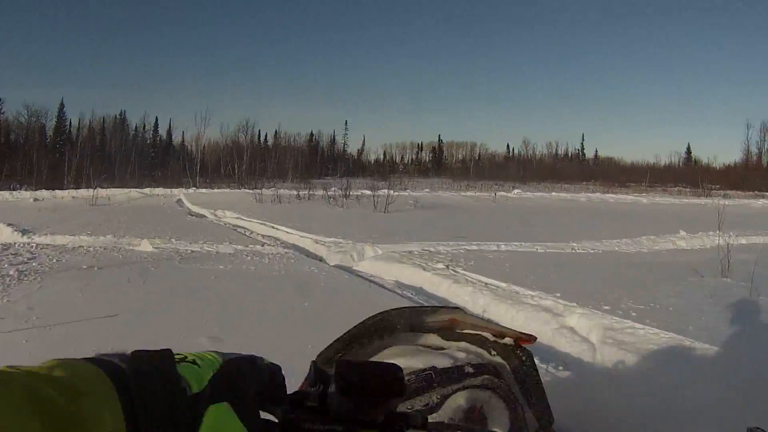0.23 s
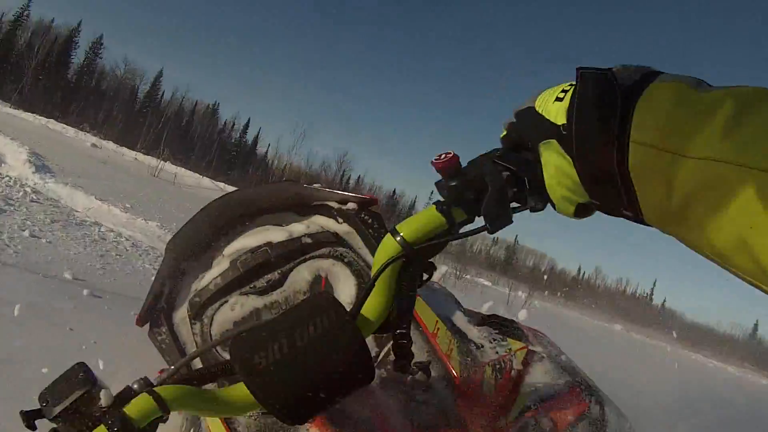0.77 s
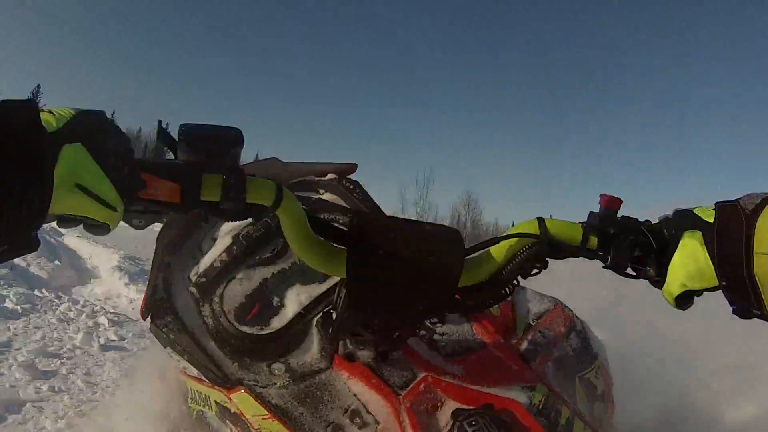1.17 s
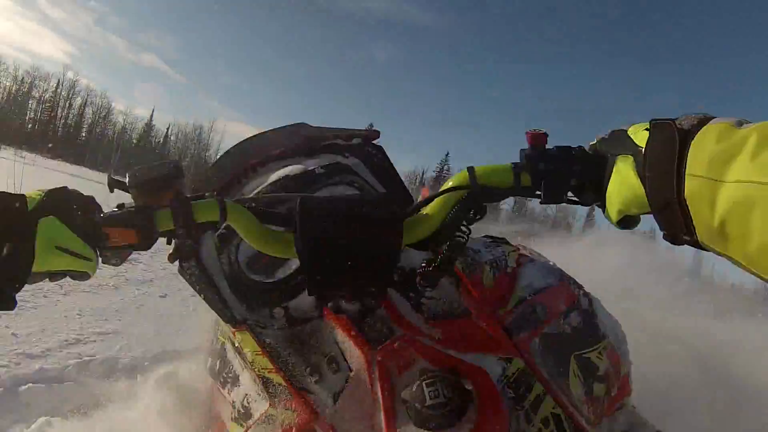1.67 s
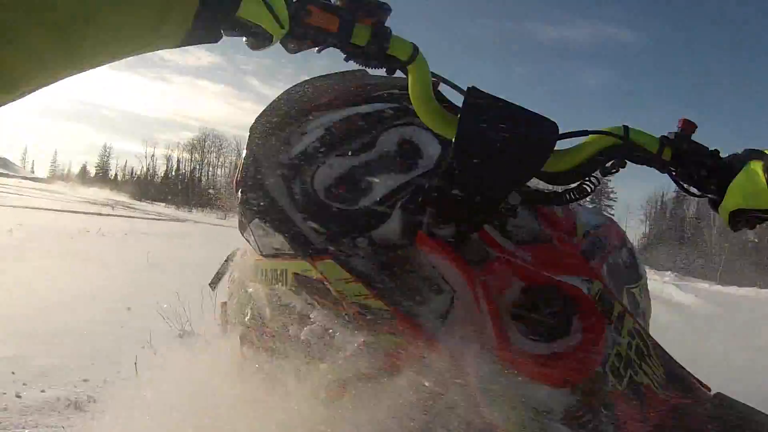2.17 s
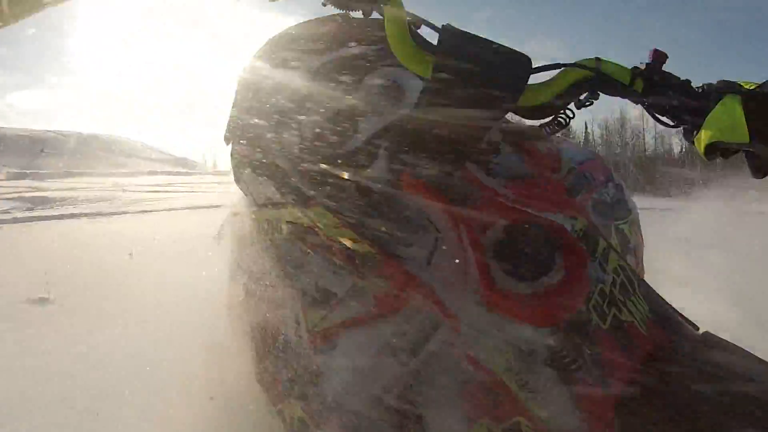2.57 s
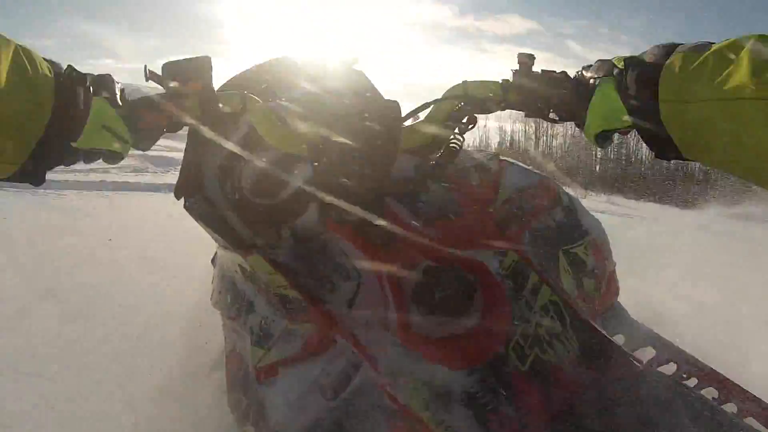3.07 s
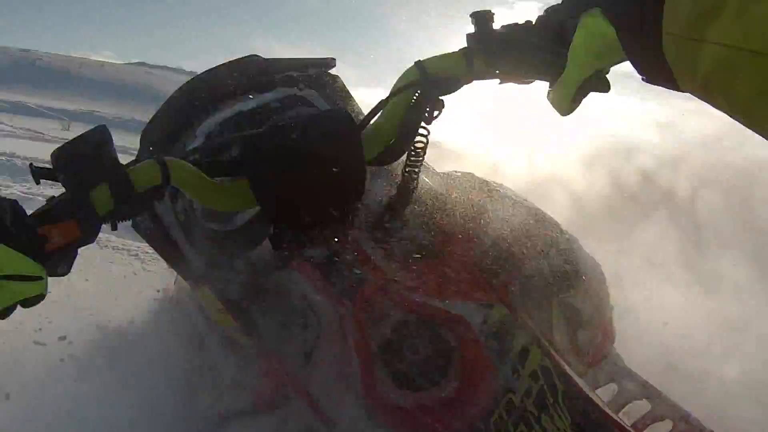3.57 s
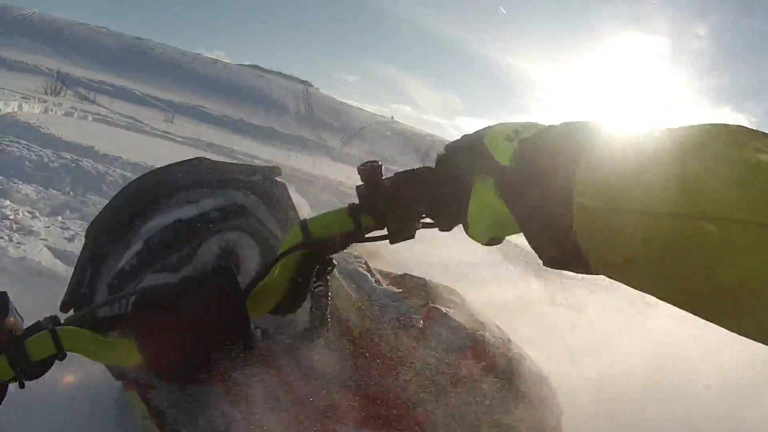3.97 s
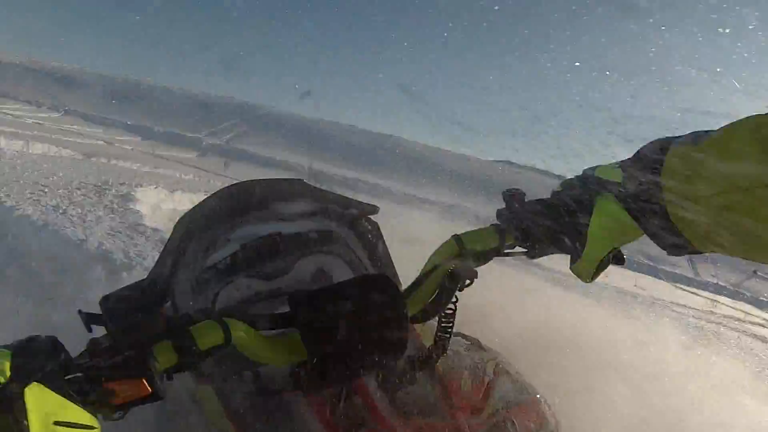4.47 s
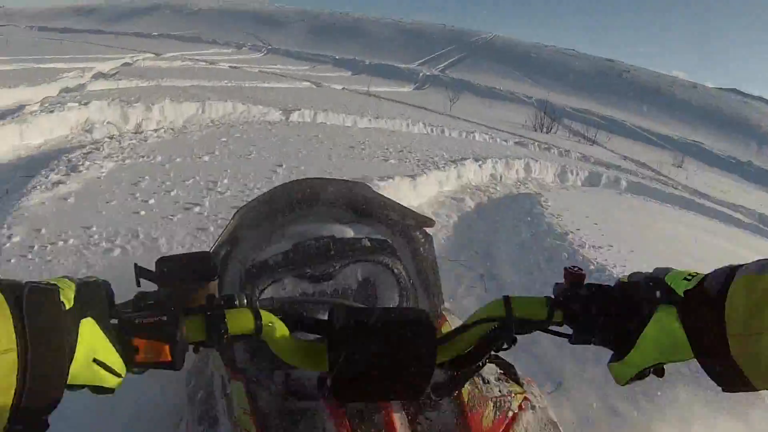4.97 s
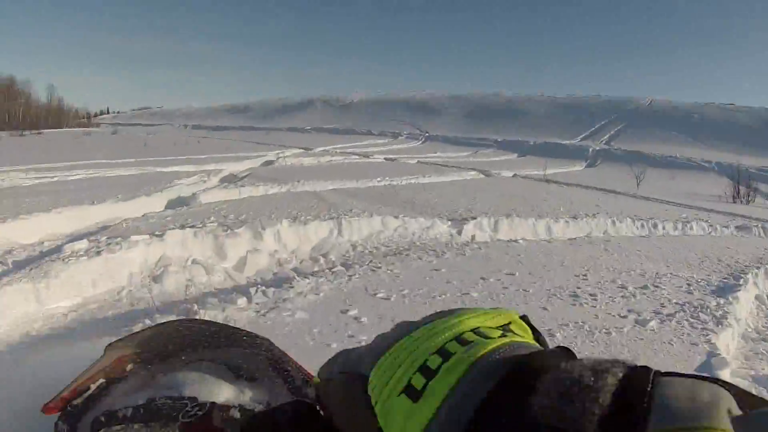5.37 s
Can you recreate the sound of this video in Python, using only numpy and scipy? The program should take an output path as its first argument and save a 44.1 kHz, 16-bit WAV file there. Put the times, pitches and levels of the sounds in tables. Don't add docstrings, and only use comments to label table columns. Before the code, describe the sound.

Close outdoor snowmobile engine: buzzing, nasal two-stroke pulls over a rough roar, two brief let-offs, sharp ice ticks, then revs rising again.

```python
import sys
import numpy as np
from scipy import signal
from scipy.fft import rfft, irfft, next_fast_len
from scipy.io import wavfile
from scipy.ndimage import uniform_filter1d, map_coordinates

SR = 44100
rng = np.random.default_rng(int(sys.argv[2]) if len(sys.argv) > 2 else 0)


def waveform_to_disk(signal):
    frames = np.transpose(np.atleast_2d(signal))
    scaled = np.clip(frames, -1, 1) * 32767
    samples = np.round(scaled).astype(np.int16)
    wavfile.write(sys.argv[1], SR, samples)


def undo_db(level):
    steps = np.asarray(level, float) / 20
    return 10 ** steps


N = 248283

# t/s,
# firing rate f/Hz, effort as roar level/dB
REVS = [
    (0, 190, -36),
    (.2, 209.7, -32.5),
    (.4, 240.5, -27),
    (.5, 257.3, -26),
    (.6, 264.2, -25),
    (.69, 261, -23),
    (.8, 221.5, -29.5),
    (.87, 204.2, -28),
        (.95, 211.1, -26.5),
    (1.101, 231.5, -27),
    (1.351, 234.4, -27.5),
    (1.62, 244.4, -26.5),
    (1.8, 239.8, -25.5),
    (2, 253.1, -24),
    (2.2, 256.8, -26),
    (2.3, 243.2, -26),
    (2.4, 240.2, -24.5),
        (2.6, 244.1, -24),
    (2.8, 241.3, -24.5),
    (3.1, 242.6, -25),
    (3.3, 244.1, -25),
    (3.41, 241.5, -26),
    (3.5, 234.3, -26),
    (3.615, 226.2, -27.5),
    (3.69, 190.4, -32.5),
    (3.8, 160.4, -37.5),
        (3.9, 151, -36.5),
    (4, 167.2, -31.5),
    (4.2, 219.8, -26),
    (4.3, 244.3, -25),
    (4.47, 250.3, -29.5),
    (4.55, 222.8, -32.5),
    (4.7, 160.4, -35.5),
    (4.8, 148.7, -38),
        (4.9, 167.6, -32.5),
    (5, 190.9, -32),
    (5.045, 189, -37),
    (5.07, 187.7, -38.5),
    (5.2, 169.4, -43.5),
    (5.32, 158.7, -42),
    (5.4, 179.6, -33.5),
    (5.5, 208.5, -31),
    (5.63, 243.7, -27),
]
# start t/s, end t/s, firing lines over the roar level/dB
PIPE_SONG = [(0.479, 0.678, 9), (0.832, .93, 4.5), (0.968, 1.142, 10), (1.149, 1.62, 6.5),
             (1.618, 2.237, 10), (2.242, 2.65, 4.5), (2.65, 3.05, 5.5), (3.05, 3.608, 8),
             (4.206, 4.308, 11), (4.309, 4.37, 8), (4.37, 4.48, 5), (5.541, 5.7, 1.5)]
# start t/s, end t/s, firing lines over the roar level/dB
SHUT = [
    (3.6, 3.839, -9.5),
    (4.499, 4.622, -7),
    (5.051, 5.327, -7),
]
# f/Hz, level/dB
LINES_AT = [(300, -2), (900, -8.5), (1200, -10), (1420, -15.5), (1700, 0.5), (2000, -10.5), (2350, -12.5),
            (2750, -2), (3000, -11.5), (3300, -29), (5000, -26.5), (6500, -30)]
# t/s, shaft order, change level/dB, half length t/s
SWELLS = [(0.094, 4, -11, .14), (0.035, 3, 12, 0.069), (0.1, 7, 14, 0.17), (0.29, 14, 16, 0.061),
          (0.74, 18, -9, 0.26), (0.64, 20, 8.5, 0.13), (0.847, 26, 8.5, .06), (1.1, 12, -4, 0.098),
          (1.3, 14, -12, 0.13), (1.37, 15, 13.5, .38), (1.293, 4, 4, 0.35), (1.78, 18, 4.5, 0.28),
          (2.03, 12, 4.5, 0.26), (2.08, 38, 11, .06), (3.735, 4, 10, .04), (2.81, 14, 0.5, 0.16),
          (3.3, 8, 2, 1.7), (2.8, 16, 5.5, 0.2), (2.043, 4, -5.5, 0.18), (2.8, 6, -5.5, 0.75),
          (2.954, 22, 7.5, 0.15), (3.4, 16, -9, .26), (3.36, 24, 5.5, 0.34), (4.23, 10, -7, 0.18),
          (3.933, 4, 11.5, 0.072), (4.223, 4, 7.5, 0.057), (4.405, 9, 10.5, 0.11), (4.4, 4, -12, 0.063),
          (4.7, 4, 7, .08), (5.565, 15, 20.5, 0.071)]
# t/s, change level/dB, half length t/s
SEAT = [
    (.03, 4.5, 0.082),
    (.22, -14, 0.071),
    (.78, 7.5, .07),
    (.92, -8, 0.076),
    (2.95, -3.5, 0.43),
    (3.74, -7, .08),
    (4.05, -7, 0.17),
    (4.5, 6.5, .07),
    (5.01, 9.5, .04),
]
# f/Hz, level/dB per Hz
ROAR = [(120, -36), (400, -34), (800, -28.5), (1000, -13), (1150, -19), (1380, -16.5), (1560, -1.5),
        (1720, 0.5), (1950, -7), (2400, -11), (2780, -5.5), (3050, -15.5), (3600, -25.5), (7000, -85)]
# t/s, level/dB, length t/s
BURNS = [
    (3.726, -31, 0.026),
    (3.794, -54, 0.018),
]
# f/Hz, level/dB per Hz
BODY = [(60, -27), (160, -19), (400, -3.5), (850, -8.5), (1050, -10.5), (1150, 5), (1280, -11.5),
        (1500, -36), (3000, -74.5)]
# f/Hz, level/dB per Hz
PANEL = [(700, -50), (1060, -12), (1150, 0), (1240, -12), (1800, -55)]
# f/Hz, level/dB per Hz
INTAKE = [(4000, -30), (6800, -13), (7400, 0.5), (8500, -7), (10000, -23), (15000, -58)]
# f/Hz, level/dB per Hz
HISS = [(2500, -24), (3300, -2.5), (3800, -2.5), (4400, -1), (5000, -0.5), (5400, 2), (5900, -4),
        (6700, -12), (7300, -5.5), (8500, -9.5), (9600, -13), (10500, -18.5), (12500, -28), (15500, -36)]
# t/s, lug rate f/Hz, lug tone level/dB
TRACK = [(0, 146, -44.5), (.4, 181, -38), (.66, 242, -44), (.88, 205, -50), (1.35, 209, -32),
         (1.7, 223, -32), (2.15, 255, -52), (2.38, 231, -33), (2.6, 235.5, -33), (3.1, 234, -33),
         (3.3, 240, -42), (3.62, 213, -33), (4, 129, -48), (4.45, 203, -39), (4.68, 175, -41),
         (5, 240, -58), (5.3, 195, -49), (5.63, 220, -52)]
# t/s, sprocket change level/dB, half length t/s
UNLOADED = [
    (.88, -25, 0.06),
    (1.76, -20, 0.038),
    (3.68, 8, .06),
    (4.76, 10, 0.097),
    (5.63, -26, 0.11),
]
# t/s, level/dB, pitch f/Hz
THUDS = [
    (1.724, -14, 259.7),
    (2.175, -25, 90.2),
    (2.879, -26, 69.9),
    (3.02, -26, 70.1),
]
# f/Hz, level/dB per Hz
WIND = [(15, -11), (30, 4), (100, -1), (250, 0.5), (600, -14), (3000, -96)]
# start t/s, end t/s, level/dB
SPRAY = [(.5, 0.614, -56), (1.733, 1.764, -49), (2.24, 2.354, -53), (2.44, 2.799, -48.5), (2.86, 3.16, -35),
         (3.221, 3.298, -51), (3.66, 4.199, -62), (4.346, 4.444, -40.5), (4.468, 4.546, -48.5),
         (4.574, 4.86, -39), (4.9, 5.169, -53)]
# f/Hz, level/dB per Hz
CRUMB = [(1500, -25), (3000, -3), (5000, -1), (6600, -5), (8000, -1), (12000, -5), (15300, -11.5),
         (16500, -28)]
# t/s, peak level/dB
TICKS = [(1.7254, -25), (2.2787, -24), (2.332, -16), (2.4621, -21), (2.5378, -13), (2.9792, -28),
         (2.9944, -25), (3.1999, -26), (3.2395, -27), (3.3297, -23), (3.7085, -27), (3.7747, -30),
         (3.861, -25), (4.0614, -32), (4.3471, -19), (4.4531, -22), (4.6833, -14), (4.839, -20),
         (4.927, -17), (4.9908, -16), (5.045, -2.5), (5.1253, -25), (5.1394, -32), (5.161, -35),
         (5.1879, -31), (5.256, -32)]
# f/Hz, level/dB per Hz
TICK = [(1000, -35), (3000, -14), (5100, 4.5), (6500, -6), (7500, -3), (10000, -9), (13500, -6),
        (15300, -10)]

FLYWHEEL_S = 0.053
PIPE_EDGE_S, OFF_PIPE_DB = .018, -2
LOW_DB, LOW_GROWS, THROB_DB = -30.5, 1.06, -4.5
UPPER_DB, UPPER_BITE = -4, .8
DULL_BELOW_HZ, DULL_DB_PER_HZ = 195, 1.1
SHUT_LOW, SHUT_THROB = 0.65, 0.75
LOW_YIELDS, ROAR_YIELDS = 0.61, .22
SPROCKET_DB, SPROCKET_DB_PER_HZ, LEAST_DB = -5, 0.11, -14.5
RISE_DB_PER_S, FALL_DB_PER_S, GUSTS_DB = 200, 600, 1.1
MIST_DB, MIST_GROWS = -57, 1.04


def unit(x):
    return x / np.sqrt(np.mean(x ** 2) + 1e-20)


def noise():
    return rng.standard_normal(N)


def along(points, hz):
    f, v = np.transpose(points)
    return np.interp(np.log(hz + 1), np.log(f + 1), v)


def curves(rows):
    s, *cols = np.transpose(rows)
    return [np.interp(np.arange(N) / SR, s, c) for c in cols]


def wobble(rate):
    coarse = np.arange(0, N + 32, 32)
    knots = rng.standard_normal(int(N * rate / SR) + 4)
    smooth = map_coordinates(knots, [coarse * rate / SR], order=2)
    return np.interp(np.arange(N), coarse, smooth)


def bumps(rows):
    return sum(db * np.exp(-((np.arange(N) / SR - s) / half) ** 4) for s, db, half in rows)


def coloured(x, spectrum):
    m = next_fast_len(N + 8192)
    cep = irfft(np.log(undo_db(along(spectrum, np.fft.rfftfreq(m, 1 / SR)))), m)
    cep[1:m // 2] *= 2
    cep[m // 2 + 1:] = 0
    return irfft(rfft(x, m) * np.exp(rfft(cep)), m)[:N]


def throttle():
    hz, effort_db = curves(REVS)
    return uniform_filter1d(hz, size=round(FLYWHEEL_S * SR), mode="nearest"), effort_db


def pipe():
    t = np.arange(N) / SR

    def step(s):
        return np.clip((t - s) / PIPE_EDGE_S + .5, 0, 1)

    spells = PIPE_SONG + SHUT
    return OFF_PIPE_DB + sum((db - OFF_PIPE_DB) * (step(a) - step(b)) for a, b, db in spells)


def swell(order):
    return bumps([(s, db, half) for s, which, db, half in SWELLS if round(which) == order])


def firing_tone(turns, roar_db, shut_db):
    throb_db = roar_db + THROB_DB + SHUT_THROB * shut_db + bumps(SEAT) + 3.5 + 0.54 * wobble(12)
    shaft_db = roar_db - 17.5 + 3.6 * wobble(19)
    return undo_db(throb_db) * np.sin(4 * np.pi * turns) + undo_db(shaft_db) * np.sin(2 * np.pi * turns)


def firing_lines(hz, turns, roar_db, bite_db, shut_db, upper_db, overrun_db):
    low_db = LOW_DB + LOW_GROWS * (roar_db + 27) - LOW_YIELDS * np.maximum(bite_db - 6, 0)
    low_db = low_db + SHUT_LOW * shut_db
    howl_db = roar_db + bite_db
    slack = np.clip(.03 - .003 * bite_db, .006, .07)
    lines = np.zeros(N)
    for order in range(3, 46):
        f = order * hz / 2
        to_howl = np.clip((f - 950) / 200, 0, 1)
        to_upper = np.clip((f - 2200) / 200, 0, 1)
        level = low_db + to_howl * (howl_db - low_db) + to_upper * (upper_db - howl_db)
        if order % 2:
            level = 0.58 * level + 0.56 * roar_db - 9.0
        level = level - overrun_db * (0.15 + 1.9 * to_howl)
        fade = 1.76 * wobble(3.95) + np.minimum((1.43 + 70 * slack) * wobble(18), 3.5) + swell(order)
        scatter = (order + 40 * slack / .07) * slack * wobble(50) * .7
        phase = 2 * np.pi * (order * turns + rng.random()) + scatter
        lines += undo_db(level + along(LINES_AT, f) + fade + 2) * np.sin(phase)
    return lines


def exhaust_roar(puff, roar_db, bite_db):
    t = np.arange(N) / SR
    uneven = undo_db(.7 * wobble(40) + 1.5 * wobble(150))
    gain = undo_db(roar_db + 3 - ROAR_YIELDS * np.maximum(bite_db, 0))
    for s, db, length in BURNS:
        gain = gain + undo_db(db) * (t > s) * np.exp(-((t - s) / length) ** 4)
    return gain * unit(coloured(puff * uneven * noise(), ROAR))


def hood_and_intake(puff, roar_db, overrun_db, climb):
    boom_db = -22.5 + 0.63 * roar_db + 0.76 * wobble(20)
    panel_db = -29.0 + 0.46 * roar_db + 0.44 * overrun_db + 5.5 * wobble(12)
    intake_db = -30.0 + 1.03 * roar_db + 0.022 * np.clip(climb, -200, 300)
    boom = undo_db(boom_db) * unit(coloured(puff * noise(), BODY))
    panel = undo_db(panel_db) * unit(coloured(noise(), PANEL))
    return boom + panel + undo_db(intake_db) * unit(coloured(noise(), INTAKE))


def mechanical_hiss(turns, roar_db, upper_db):
    pulse = 1 + 0.049 * np.cos(4 * np.pi * turns)
    level = -18.5 + 0.61 * roar_db + 0.11 * upper_db + 0.16 * wobble(17)
    return undo_db(level) * unit(coloured(pulse * noise(), HISS))


def engine():
    (hz, roar_db), bite_db = throttle(), pipe()
    turns = np.cumsum(hz / 2) / SR
    shut_db = np.minimum(bite_db - OFF_PIPE_DB, 0)
    dull_db = DULL_DB_PER_HZ * np.maximum(DULL_BELOW_HZ - hz, 0)
    upper_db = roar_db + UPPER_DB + UPPER_BITE * bite_db - dull_db
    climb = uniform_filter1d(np.gradient(hz) * SR, 2500)
    overrun_db = np.clip(-.045 * climb - 3, 0, 14) * np.clip((222 - hz) / 25, 0, 1)
    puff = 1 + 0.4 * np.cos(4 * np.pi * turns) + 0.14 * np.cos(2 * np.pi * turns)
    sound = firing_tone(turns, roar_db, shut_db)
    sound += firing_lines(hz, turns, roar_db, bite_db, shut_db, upper_db, overrun_db)
    sound += exhaust_roar(puff, roar_db, bite_db)
    sound += hood_and_intake(puff, roar_db, overrun_db, climb)
    return sound + mechanical_hiss(turns, roar_db, upper_db)


def track():
    hz, lug_db = curves(TRACK)
    drive_db = SPROCKET_DB + SPROCKET_DB_PER_HZ * (np.minimum(hz, 238) - 235)
    sprocket_db = throttle()[1] + np.maximum(drive_db, LEAST_DB) + bumps(UNLOADED)
    turns = np.cumsum(hz / 2) / SR
    hum = undo_db(lug_db + 3 + 1.6 * wobble(12)) * np.sin(4 * np.pi * turns)
    hum += undo_db(sprocket_db - 1.5 + 0.67 * wobble(13)) * np.sin(2 * np.pi * turns + 1)
    t = np.arange(2000) / SR
    for s, db, thud_hz in THUDS:
        thud = undo_db(db - 60 * t * thud_hz / 4) * np.sin(2 * np.pi * thud_hz * t)
        hum[round(s * SR):][:len(t)] += thud
    return hum


def wind():
    level = -32.5 + 0.36 * throttle()[1] + 3.0 * wobble(10)
    return undo_db(level) * unit(coloured(noise(), WIND))


def powder():
    now = np.arange(N) / SR
    level = undo_db(MIST_DB + MIST_GROWS * (throttle()[1] + 28))
    for start, end, db in SPRAY:
        before, after = np.maximum(start - now, 0), np.maximum(now - end, 0)
        level = level + undo_db(db - RISE_DB_PER_S * before - FALL_DB_PER_S * after)
    chance, size = rng.random(N), rng.exponential(1, N)
    lands = chance < 1000 / SR * undo_db(4 * wobble(40))
    grains = lands * undo_db(3 * np.minimum(size, 3.5)) * noise()
    patter = unit(coloured(unit(grains) + 0.87 * noise(), CRUMB))
    return level * undo_db(7 + GUSTS_DB * wobble(14)) * patter


def ice_crumbs():
    hits, t = np.zeros(N + 400), np.arange(300) / SR
    for s, db in TICKS:
        rattle = undo_db(-10 - 60 * t / .009) * rng.standard_normal(len(t))
        knock = -2.6 * (t == 0)
        hits[round((s + .0015) * SR):][:len(t)] += undo_db(db) * (rattle + knock)
    return undo_db(5.0) * coloured(hits[:N], TICK)


def scene():
    return (engine() + track() + wind() + powder() + ice_crumbs())[None]


def top_cut(x):
    return signal.sosfilt(signal.butter(12, 16480, fs=SR, output="sos"), x)


def record(dry):
    m = next_fast_len(N + 4096)
    keep = np.clip((15200 - np.fft.rfftfreq(m, 1 / SR)) / 300, 0, 1)
    mix = irfft(rfft(dry, m) * keep, m)[:, :N]
    return top_cut(mix)


dry = scene()
out = record(dry)
waveform_to_disk(out)
```